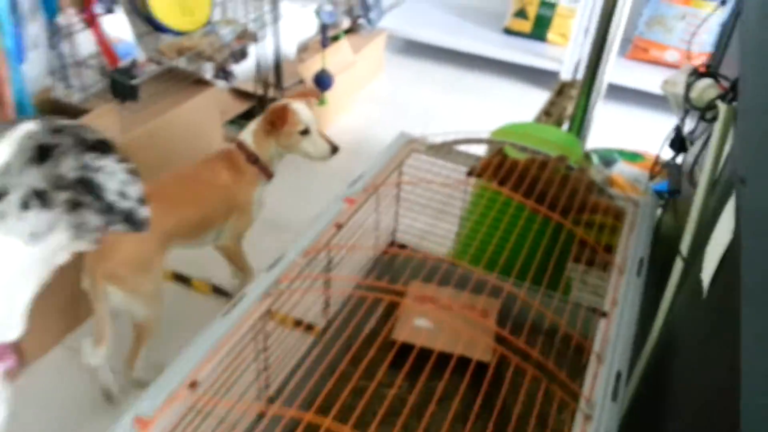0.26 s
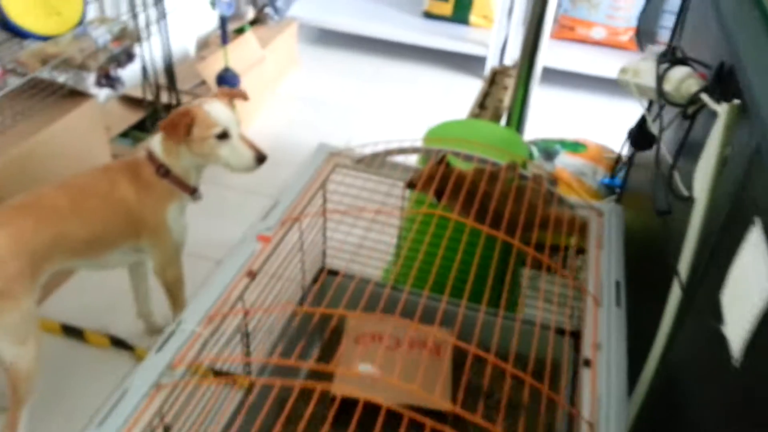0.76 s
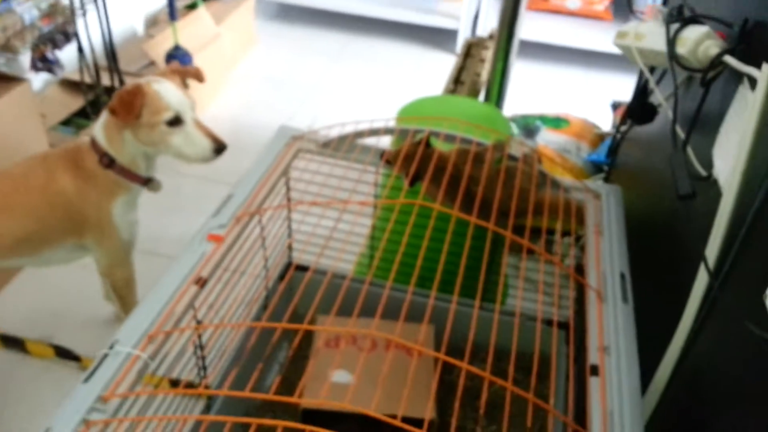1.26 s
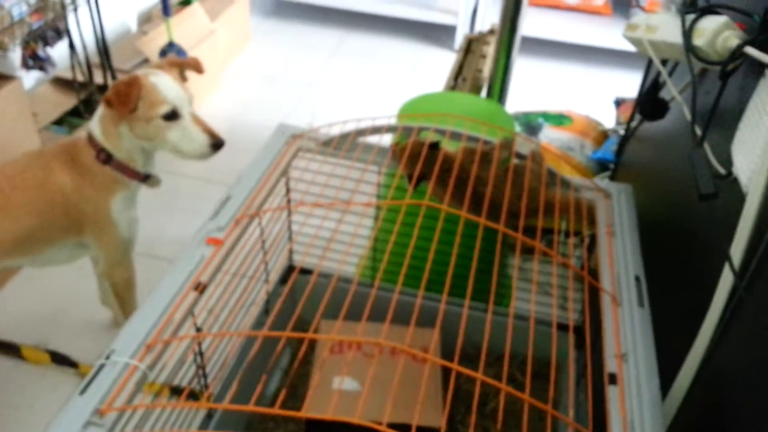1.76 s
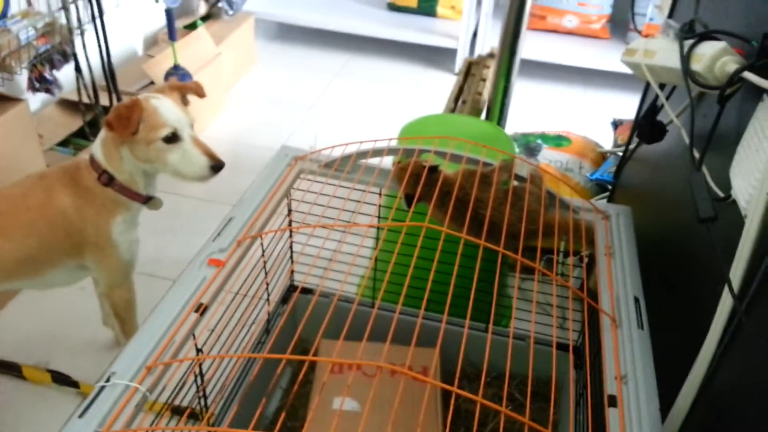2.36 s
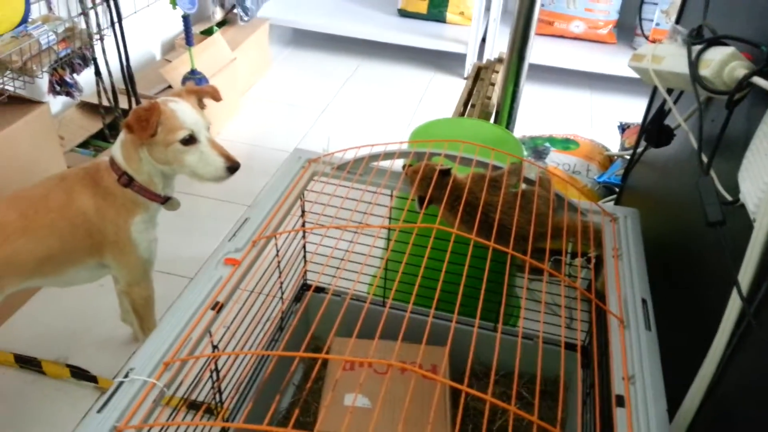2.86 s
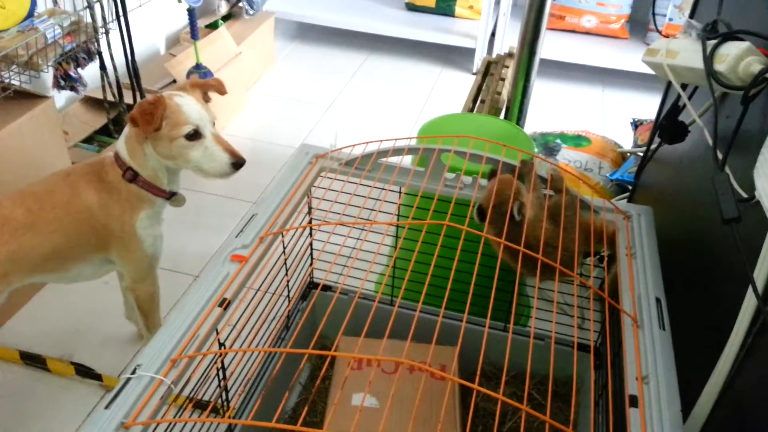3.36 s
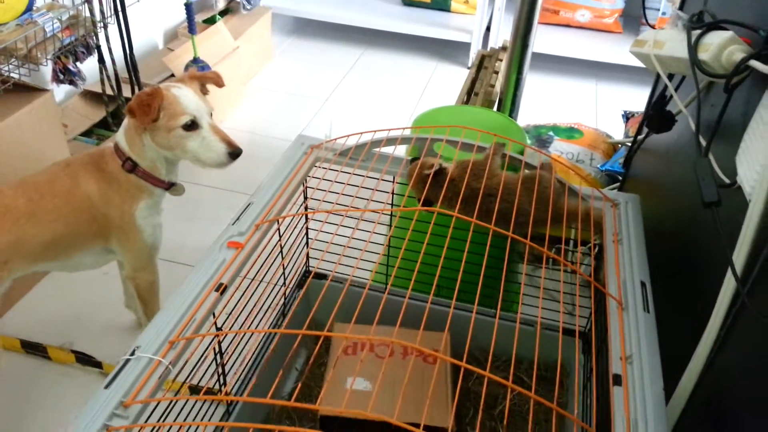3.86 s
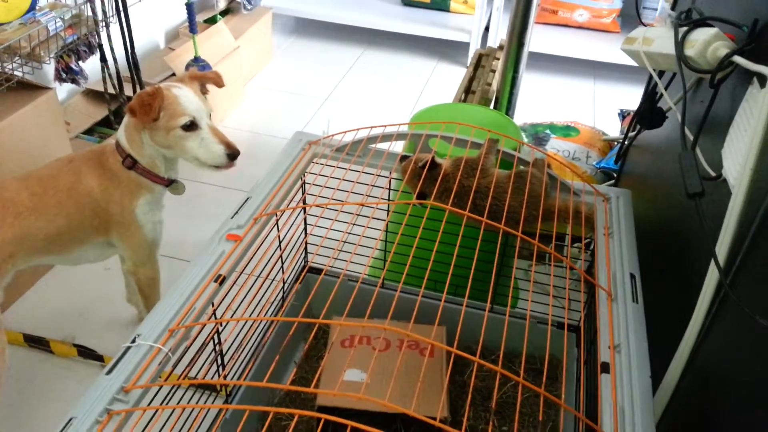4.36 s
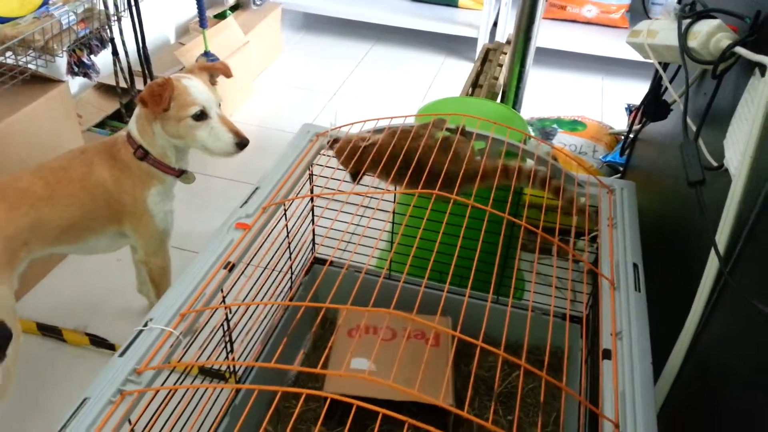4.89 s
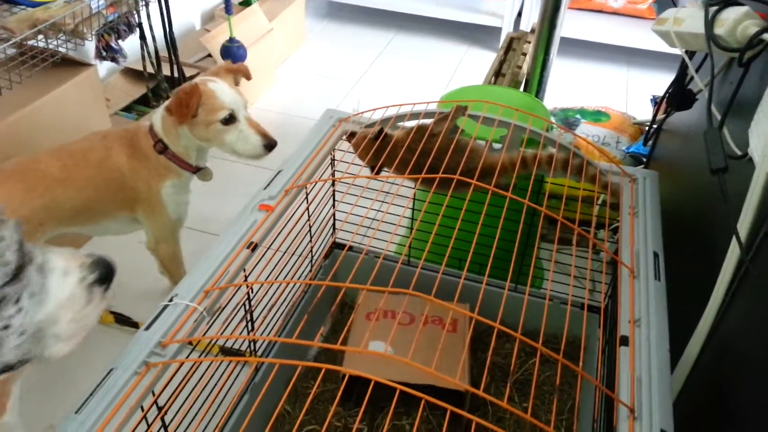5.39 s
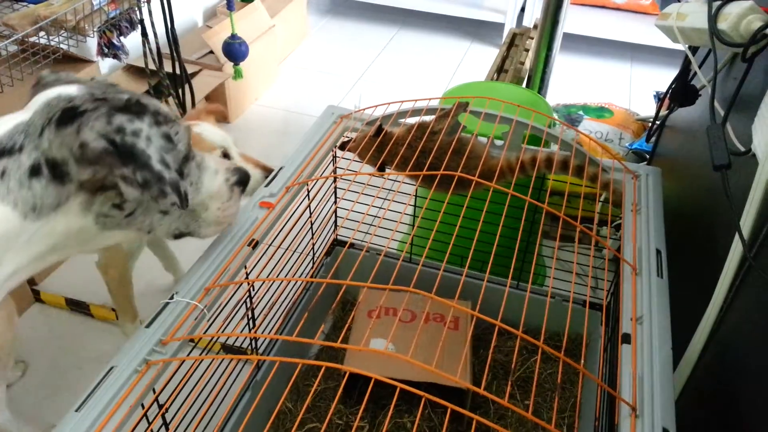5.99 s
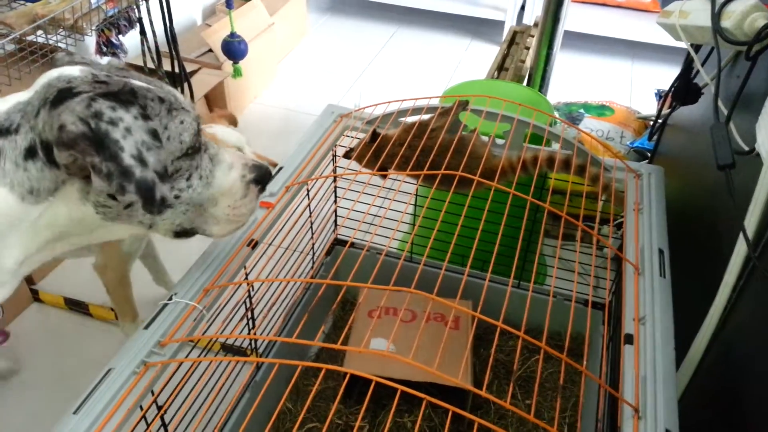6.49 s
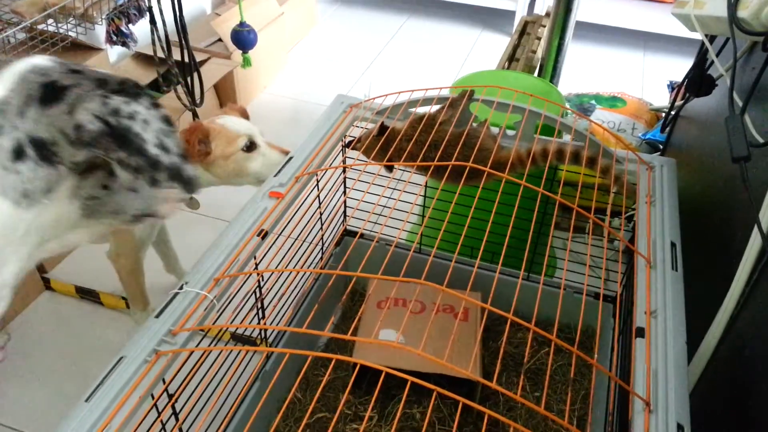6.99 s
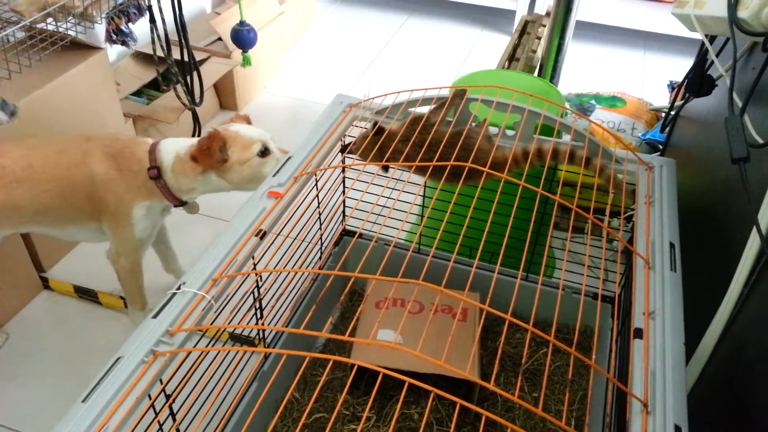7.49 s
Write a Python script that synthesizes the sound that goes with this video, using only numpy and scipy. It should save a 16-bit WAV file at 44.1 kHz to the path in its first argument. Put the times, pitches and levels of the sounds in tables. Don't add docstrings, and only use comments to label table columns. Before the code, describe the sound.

A handheld stereo microphone in a reverberant shop picks up fan and street hum, then sudden shrill chirps from caged animals, reaching clipping loudness. A whistle and rasping chirps open, squawks follow, and spaced calls continue with faint trailing peeps. Claw ticks and paw scuffs come first, sniffs gather in the later part, with barely audible dog whines and tiny collar tag rings.

```python
import sys
import numpy as np
from scipy import signal
from scipy.fft import rfft, irfft, next_fast_len
from scipy.io import wavfile
from scipy.ndimage import uniform_filter1d

SR = 44100
rng = np.random.default_rng(int(sys.argv[2]) if len(sys.argv) > 2 else 0)


def put_to_file(sound):
    columns = np.atleast_2d(sound).T
    safe = np.clip(columns, -1, 1)
    whole_steps = np.round(safe * 32767)
    wavfile.write(sys.argv[1], SR, whole_steps.astype(np.int16))


def volts_from_decibels(level):
    exponent = np.asarray(level, float) / 20
    return 10 ** exponent


N = 341334


def rms_one(x):
    return x / np.sqrt(np.mean(x ** 2) + 1e-20)


def in_time(rows):
    return np.interp(np.arange(N) / SR, *np.transpose(rows))


def at_hz(points, hz):
    curve_hz, values = np.transpose(points)
    return np.interp(np.log(hz), np.log(curve_hz), values)


def band(x, low_hz, high_hz, order=2):
    edges = [max(low_hz, 10), min(high_hz, .45 * SR)]
    return signal.sosfilt(signal.butter(order, edges, "band", fs=SR, output="sos"), x)


def drift(hz):
    r = np.exp(-2 * np.pi * hz / SR)
    settled = signal.lfilter([1], [1, -2 * r, r * r], rng.standard_normal(N + SR))[SR:]
    return rms_one(settled)


def swell(count, sharp):
    return np.sin(np.pi * (np.arange(count) + .5) / count) ** sharp


def part(s, db, pattern, waver_hz, hold=1):
    delay, length, from_hz, to_hz, part_db = pattern
    return s + delay, length * hold, from_hz, to_hz, db + part_db, waver_hz


def wavering(rows, waver_hz):
    return [(*row, waver_hz) for row in rows]


def sung(notes, flutter_hz, octave_db):
    out = np.zeros(N + SR)
    waver = 2.38 * np.tanh(drift(flutter_hz) / 2)
    for k, (s, length, from_hz, to_hz, db, waver_hz) in enumerate(notes):
        i, n = round(s * SR), max(round(length * SR), 64)
        own_waver = np.roll(waver, -5003 * k)[:n]
        pitch = np.linspace(from_hz, to_hz, n) + waver_hz * own_waver
        phase = 2 * np.pi * np.cumsum(pitch) / SR
        effort_db = 0.37 * (db + 6.5)
        height_db = 16.6 * np.log2(max(from_hz, 2000) / 3000)
        octave = volts_from_decibels(octave_db + effort_db - height_db)
        tone = np.sin(phase) + octave * np.sin(2 * phase)
        out[i:i + n] += volts_from_decibels(db) * swell(n, sharp=0.1) * tone
    return out[:N]


def chirps():
    # start in seconds, level in dB, lead-in length in s, held voices in dB, closing rasp in dB.
    loud_calls = [
        (1.107, -1, 0.025, 1.5, -1.5),
        (2.213, -1, .026, -1.5, -0.5),
        (3.000, -1, 0.038, 1, 0),
        (4.307, 0.5, 0.039, 0, -2.5),
        (7.618, -0.5, 0.043, -3, 1),
    ]
    # delay in s, from in Hz, to in Hz, level in dB.
    lead_in = (-.007, 3270.5, 3423.5, -7.5)
    # delay in s, length in s, from in Hz, to in Hz, level in dB.
    soft_start = (-.014, .011, 3191, 3287, -23.5)
    opening_rasp = (.0005, .036, 4195, 4550.5, -8.5)
    undertone = (.006, .024, 2419, 2501, -19.5)
    held_high = (.034, .048, 3880.5, 4057.5, -7.5)
    held_low = (.047, .04, 3030, 2924.5, -9)
    closing = (.045, .065, 3450.5, 4149.5, -5)
    notes = []
    delay, *lead = lead_in
    for s, db, lead_s, held_db, closing_db in loud_calls:
        notes += [part(s, db, (delay, lead_s, *lead), waver_hz=22),
                  part(s, db, opening_rasp, waver_hz=604),
                  part(s, db, undertone, waver_hz=148),
                  part(s, db + held_db, held_high, waver_hz=100),
                  part(s, db + held_db, held_low, waver_hz=37.6),
                  part(s, db + closing_db, closing, waver_hz=360),
                  part(s, db, soft_start, waver_hz=22)]
    return notes


def whistles():
    # start in seconds, hold as a multiple of the pattern, upper voice in dB, lower voice in dB.
    doubles = [
        (.891, 1.75, 1, -13),
        (2.166, 1.01, 1, -9),
    ]
    # delay in s, length in s, from in Hz, to in Hz, level in dB; the steady one has no level.
    step_one = (.002, .022, 5080, 4900, -16.5)
    step_two = (.016, .036, 4900, 4560, -9)
    steady = (.003, .034, 3620, 3690)
    mixes = [(2, -1), (1, 1), (2, 0), (0, 3), (2, 1)]
    mix_db = [-26, -46, -41.5, -45.5, -46]
    # start in seconds, length in s, from in Hz, to in Hz, level in dB.
    grace = [
        (.88, .0113, 3050, 3800, -24),
        (.949, 0.024, 3734, 3855, -11.5),
        (4.284, 0.019, 3480, 3360, -31),
        (4.287, 0.027, 4480, 4480, -23),
    ]
    smooth_hz, step_hz = 13, 30
    notes = wavering(grace, smooth_hz)
    delay, length, low_from, low_to = steady
    for s, hold, upper_db, lower_db in doubles:
        notes += [part(s, upper_db, step_one, step_hz),
                  part(s, upper_db, step_two, smooth_hz, hold),
                  part(s, lower_db, (*steady, 0), smooth_hz, hold)]
        for (up, down), db in zip(mixes, mix_db):
            from_hz = up * step_one[2] + down * low_from
            to_hz = up * step_two[3] + down * low_to
            notes.append(part(s, db, (delay, length, from_hz, to_hz, 0), step_hz, hold))
    return notes


def squawks():
    # start in seconds, length in s, from in Hz, to in Hz, level in dB.
    cores = [
        (1.270, 0.023, 3850, 3866, -13.5),
        (1.272, .018, 2990, 3003, -7.5),
        (1.431, 0.034, 4020, 4096, -15.5),
        (5.326, 0.037, 3117, 3340, -15.5),
        (5.375, .018, 2540, 2484, -7.5),
        (5.401, 0.011, 3637, 3397, -5.5),
    ]
    # start in seconds, length in s, from in Hz, to in Hz, level in dB.
    rasp_rows = [(1.2, .09, 3500, 4330, -32), (1.293, 0.074, 2300, 2652, -16.5),
                 (1.338, 0.057, 3450, 3280, -13), (1.345, 0.038, 2433, 2284, -18.5),
                 (1.422, 0.038, 5340, 5670, -21.5), (1.438, .04, 3400, 2868, -13.5),
                 (1.469, .055, 3191, 3952, -10.5), (1.473, .05, 2300, 2196, -26),
                 (4.489, 0.033, 3000, 2583, -10), (4.490, 0.1, 1910, 2125, -30.5),
                 (4.511, 0.053, 3500, 4475, -20), (4.515, 0.044, 3320, 3398, -8.5),
                 (4.526, .048, 2660, 2583, -16.5), (5.335, .063, 3770, 4040, -22.5),
                 (5.364, .018, 2146, 2370, -19), (5.393, 0.019, 4700, 4480, -19),
                 (5.396, 0.038, 2303, 3280, -16), (5.414, 0.024, 3010, 2990, -9)]
    rasps = []
    for s, length, from_hz, to_hz, db in rasp_rows:
        waver_hz = 203.4 + 0.261 * abs(to_hz - from_hz)
        rasps.append((s, length, from_hz, to_hz, db, waver_hz))
    return wavering(cores, waver_hz=85) + rasps


def peeps():
    # start in seconds, level in dB, upper voice in dB, bend of the upper voice in Hz.
    low_peeps = [
        (1.719, -27, -30, -420),
        (3.458, -29.5, -37, -220),
    ]
    high_peeps = [
        (6.189, -26, -26.5, 190),
        (7.260, -30, -29.5, -74),
    ]
    # delay in s, length in s, from in Hz.
    low_pair = [(.0005, .081, 2930, 2990), (.018, .06, 3780)]
    high_pair = [(.008, .115, 3300, 3400), (0.0066, 0.081, 4270)]
    # start in seconds, length in s, from in Hz, to in Hz, level in dB.
    trails = [
        (1.823, 0.057, 3346, 3283, -28.5),
        (1.889, 0.026, 3010, 3020, -32.5),
        (1.895, 0.087, 3570, 3240, -26.5),
        (1.970, 0.061, 3580, 3485, -27.5),
        (3.563, 0.087, 3343, 3493, -24.5),
        (6.263, .054, 4420, 3930, -31),
        (7.355, .065, 3630, 3454, -28),
        (7.425, 0.05, 3483, 3470, -26.5),
    ]
    waver_hz = 32.3
    notes = wavering(trails, waver_hz)
    for calls, (lower, upper) in ((low_peeps, low_pair), (high_peeps, high_pair)):
        for s, db, upper_db, bend_hz in calls:
            bent = (*upper, upper[-1] + bend_hz, 0)
            notes += [part(s, db, (*lower, 0), waver_hz), part(s, upper_db, bent, waver_hz)]
    return notes


def callers():
    # frequency in Hz, gain in dB.
    mouth_curve = [(900, -31), (1500, -27), (2500, -0.5), (5500, 1.5), (7000, -1), (8700, 3), (10500, -19),
                   (13000, 5.5), (15000, -16)]
    voices = sung(chirps() + whistles() + squawks() + peeps(), flutter_hz=318.0, octave_db=-19.5)
    effort = np.sqrt(np.abs(uniform_filter1d(voices ** 2, size=300))) + 1e-6
    shape = voices / effort
    overtones = volts_from_decibels(-27.5) * shape ** 2 + volts_from_decibels(-26.5) * shape ** 3
    breath = volts_from_decibels(-22) * band(rng.standard_normal(N), 3500, 12000)
    size = next_fast_len(N)
    mouth = volts_from_decibels(at_hz(mouth_curve, np.arange(size // 2 + 1) * SR / size + 1))
    radiated = irfft(rfft(effort * (overtones + breath), size) * mouth, size)[:N]
    return voices + radiated


def puffs():
    # start in seconds, level in dB.
    ticks = [
        (.283, -46),
        (0.5576, -41),
        (2.0, -48),
    ]
    # start in seconds, length in s, lowest in Hz, level in dB.
    sniffs = [
        (3.582, 0.18, 4480, -48.5),
        (4.173, 0.068, 4500, -46),
        (5.014, .05, 1500, -44),
        (5.862, 0.022, 4000, -47),
        (6.014, 0.075, 2500, -41),
        (6.297, .14, 5000, -51),
        (6.57, 0.04, 4970, -54),
        (6.693, 0.18, 1500, -47.5),
        (6.878, .094, 3000, -46.5),
    ]
    # start in seconds, length in s, lowest in Hz, level in dB.
    snorts = [
        (3.287, 0.051, 8000, -50.5),
        (4.14, 0.048, 5000, -56),
        (4.981, 0.023, 4000, -72),
    ]
    # start in seconds, length in s, highest in Hz, level in dB.
    scuffs = [
        (2.446, 0.11, 1660, -41.5),
        (2.564, 0.019, 2200, -38.5),
        (4.981, 0.077, 4350, -38),
        (5.144, 0.025, 3000, -43),
    ]
    # start in seconds, length in s, highest in Hz, level in dB.
    thuds = [
        (4.69, 0.064, 910, -39.5),
        (6.704, 0.047, 485, -37.5),
    ]
    rows = [(s, .0026, 700, 8500, db) for s, db in ticks]
    for table, top_hz in ((sniffs, 9900), (snorts, 13800)):
        rows += [(s, length, hz, top_hz, db) for s, length, hz, db in table]
    for table, low_hz in ((scuffs, 520), (thuds, 125)):
        rows += [(s, length, low_hz, hz, db) for s, length, hz, db in table]
    return rows


def dogs():
    out = np.zeros(N)
    air = rng.standard_normal(N) * volts_from_decibels(1.3 * drift(70))
    for s, length, low_hz, high_hz, db in puffs():
        i, n = round(s * SR), max(round(length * SR), 64)
        flow = swell(n, sharp=0.13) * np.exp(-1.2 * np.arange(n) / n)
        puff = band(air[i - 4000:i + n], low_hz, high_hz)[4000:]
        out[i:i + n] += volts_from_decibels(db) * flow * rms_one(puff)
    return out


def faint():
    # start in seconds, length in s, pitch in Hz, level in dB.
    whine_rows = [
        (.001, .04, 835, -33.5),
        (1.42, .048, 520, -34.5),
        (1.64, 0.084, 531, -40),
        (2.45, 0.038, 366, -33.5),
        (2.452, 0.02, 790, -28.5),
        (3.72, 0.035, 1074, -37.5),
        (4.065, .096, 816, -34),
        (4.27, 0.025, 869, -34),
        (4.53, 0.041, 1153, -34),
    ]
    # start in seconds, length in s, from in Hz, to in Hz, level in dB.
    tags = [
        (1.245, 0.034, 10800, 12030, -38.5),
        (1.645, .049, 10700, 11900, -46.5),
        (3.52, 0.017, 11400, 11800, -51),
        (5.90, .026, 11800, 11400, -43.5),
    ]
    whines = [(s, length, hz, hz, db) for s, length, hz, db in whine_rows]
    return wavering(whines, waver_hz=13.3) + wavering(tags, waver_hz=80)


def shop(x, direct_db):
    # frequency in Hz, time to fall 60 dB in seconds.
    t60 = [(200, 1), (2000, 0.54), (3500, .55), (6000, 0.54), (12000, 0.52)]
    build_s, early_db, early_s, ear_lag = 0.00082, 7, 0.0096, 4
    t, echo = np.arange(SR) / SR, 0
    white = rng.standard_normal((2, SR))
    edges = 100 * 2 ** np.arange(0, 7.6, .5)
    for low, high in zip(edges, edges[1:]):
        decay = volts_from_decibels(-60 * t / at_hz(t60, np.sqrt(low * high)))
        echo = echo + band(white, low, high) * decay
    echo = echo * (1 - np.exp(-t / build_s)) * volts_from_decibels(early_db * np.exp(-t / early_s))
    echo = echo / np.sqrt(np.sum(echo ** 2, axis=1, keepdims=True))
    direct = np.array([x, np.roll(x, ear_lag)])
    return volts_from_decibels(direct_db) * direct + signal.fftconvolve(x[None], echo, axes=1)[:, :N]


def hum():
    # frequency in Hz, level in dB per Hz.
    color = [(15, -60), (25, -45), (60, -15.5), (92, -21.5), (137, -12), (179, -9), (275, -2), (340, -9.5),
             (399, -7.5), (1010, -7), (1510, -13), (1720, -13), (5000, -20.5), (6020, -26.5),
             (14500, -31.5)]
    # time in seconds, level in dB.
    loudness = [(0.0, -44), (0.71, -46.5), (1.59, -43), (1.83, -46), (2.8, -48), (3.64, -45), (3.99, -47.5),
                (4.76, -44.5), (6.03, -45.5), (7.74, -46.5)]
    # frequency in Hz, left-right likeness from -1 to 1.
    likeness = [(60, 0.57), (150, 1), (370, 0.8), (930, 0.14), (2310, -0.0031), (5760, -0.024),
                (14300, -0.17)]
    # frequency in Hz, left over right in dB.
    lean_curve = [(60, -1), (180, 1), (540, -0.5), (1600, -3.5), (4800, -2.5), (14300, 3)]
    out, together = 0, drift(2.5)
    edges = 22 * 2 ** np.arange(0, 9.6, .5)
    white = rng.standard_normal((2, 2, N))
    for k, (low, high) in enumerate(zip(edges, edges[1:])):
        mid, side = band(white[k % 2], low, high)
        hz = np.sqrt(low * high)
        alike = np.clip(at_hz(likeness, hz), -1, 1)
        lean = volts_from_decibels(at_hz(lean_curve, hz) * np.array([[.5], [-.5]]))
        gain = volts_from_decibels(at_hz(color, hz) + 0.64 * together + 1.76 * np.roll(drift(7.0), k))
        pair = np.sqrt(1 + alike) * mid + np.sqrt(1 - alike) * side * [[1], [-1]]
        out = out + gain * lean * pair
    return volts_from_decibels(in_time(loudness) + 4.0) * rms_one(out)


def scene():
    # time in seconds, left over right in dB.
    bearing = [(0.0, -2), (0.82, 0), (1.29, -2), (3.08, -1.0), (3.6, -4.5), (4.24, 0.5), (4.7, -2),
               (5.3, -2), (7.74, -0.5)]
    far = shop(callers() + sung(faint(), flutter_hz=40, octave_db=-23), direct_db=-8)
    far = far * volts_from_decibels(in_time(bearing) * np.array([[.5], [-.5]]))
    near = volts_from_decibels(-4) * shop(dogs(), direct_db=7.5)
    return far + near + hum()


def masked(x):
    # frequency in Hz, limit in dB relative to the loudest band.
    mask_curve = [(60, -36), (110, -48), (170, -75), (6000, -75), (8000, -54), (9500, -41), (11000, -38),
                  (14000, -44)]
    hz, _, frames = signal.stft(x, SR, nperseg=2048)
    level = np.sqrt(uniform_filter1d(np.abs(frames) ** 2, size=12, axis=1))
    limit = level.max(axis=1, keepdims=True) * volts_from_decibels(at_hz(mask_curve, hz + 1))[:, None]
    return signal.istft(frames * (level > limit), SR, nperseg=2048)[1][:, :N]


def low_pass(x):
    return signal.sosfilt(signal.butter(12, 14940, fs=SR, output="sos"), x)


def record(dry):
    mix = masked(np.clip(dry, -1, 1))
    return low_pass(mix)


dry = scene()
out = record(dry)
put_to_file(out)
```